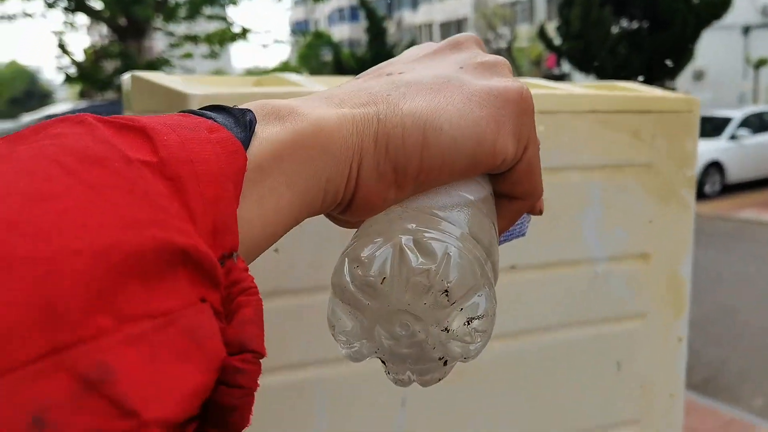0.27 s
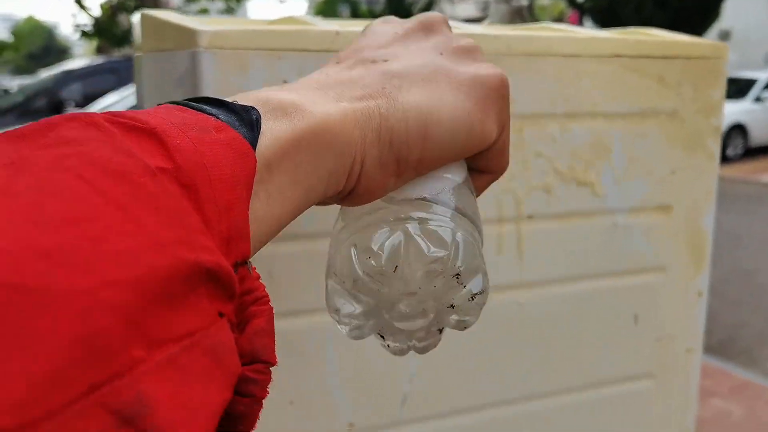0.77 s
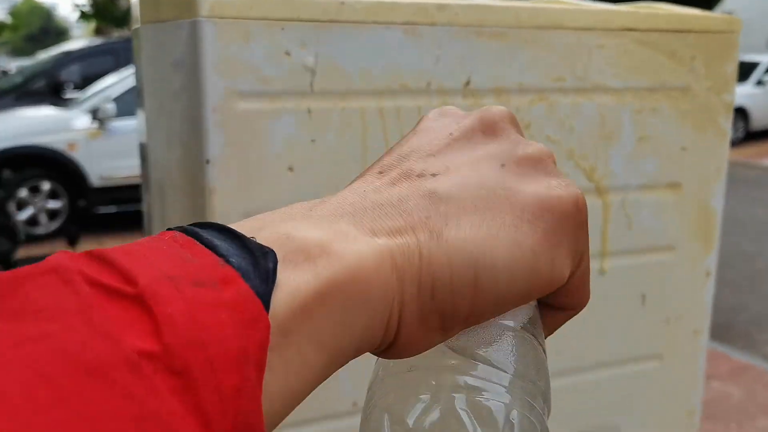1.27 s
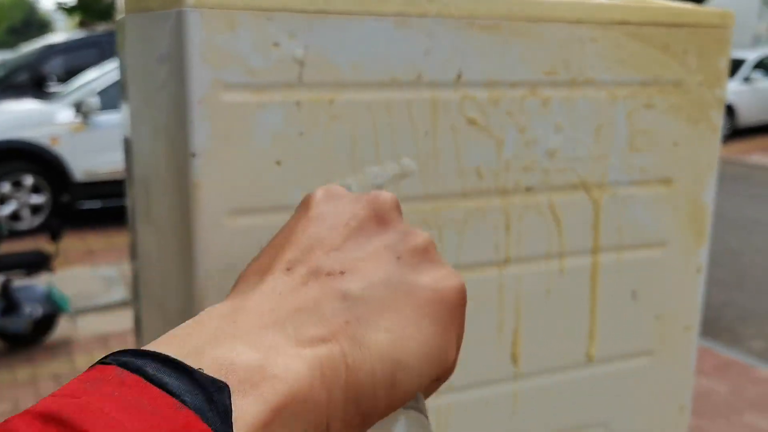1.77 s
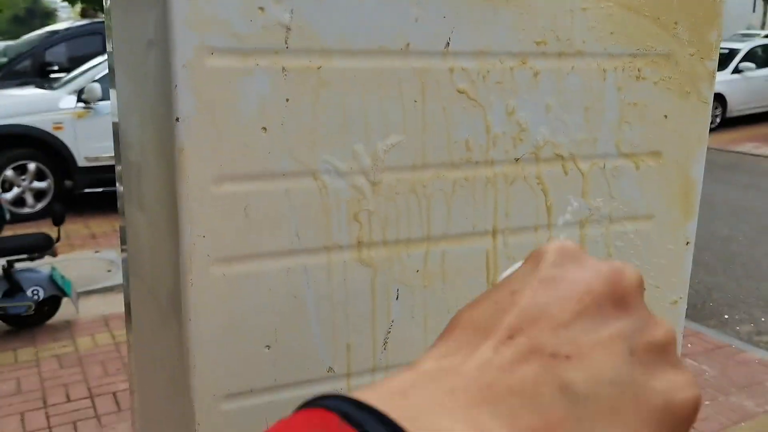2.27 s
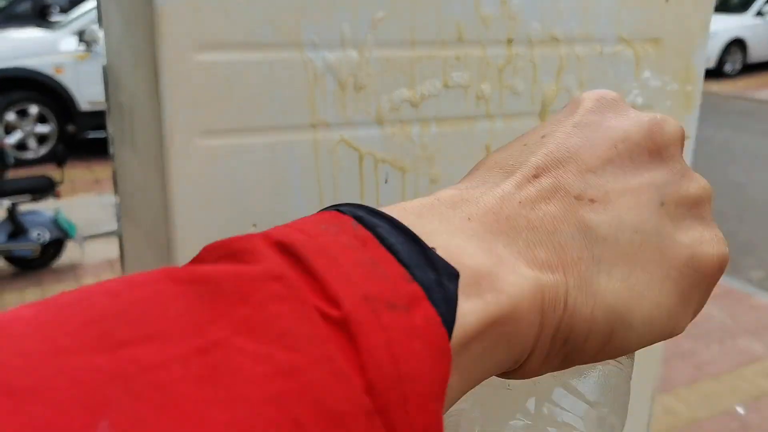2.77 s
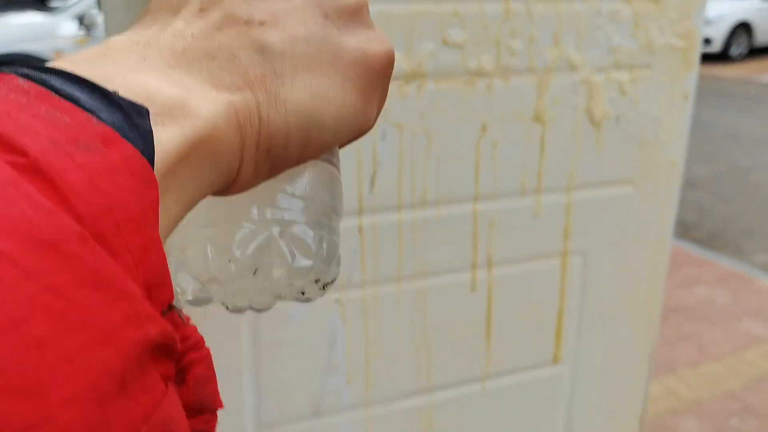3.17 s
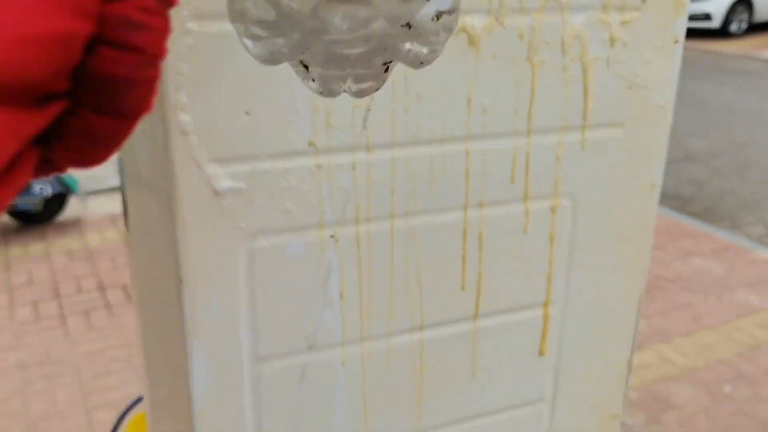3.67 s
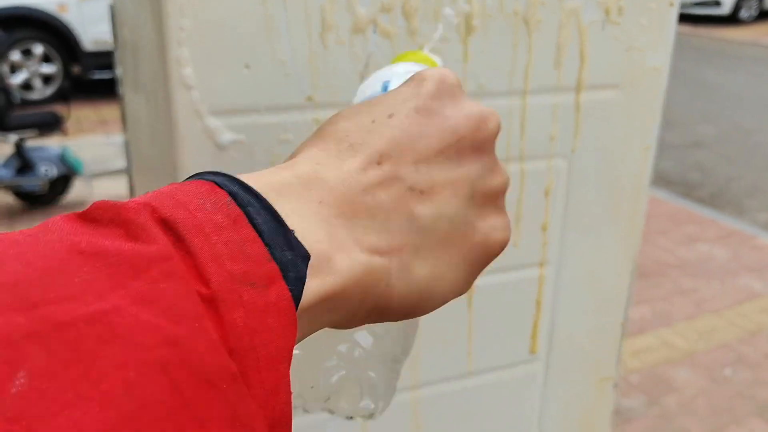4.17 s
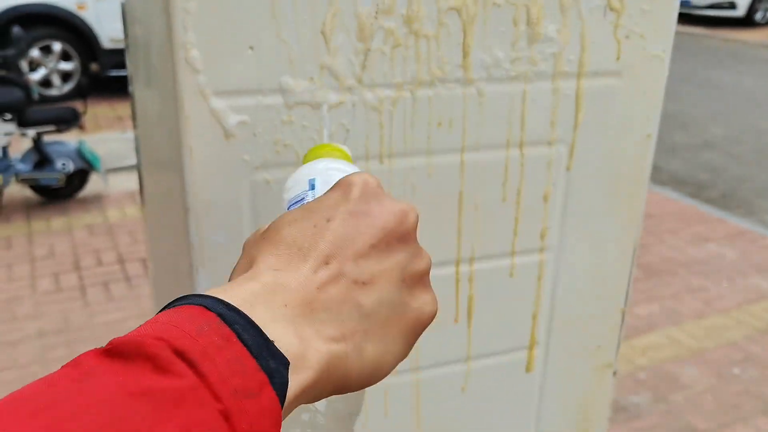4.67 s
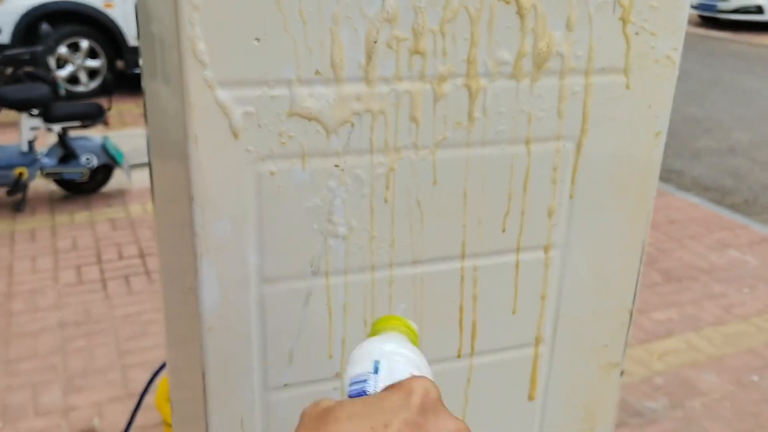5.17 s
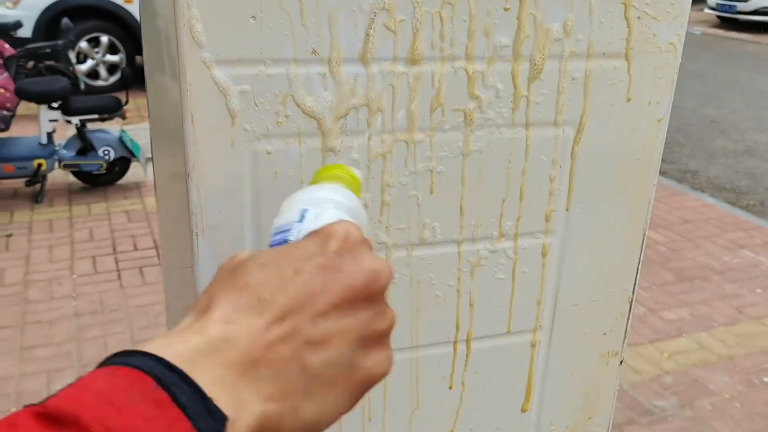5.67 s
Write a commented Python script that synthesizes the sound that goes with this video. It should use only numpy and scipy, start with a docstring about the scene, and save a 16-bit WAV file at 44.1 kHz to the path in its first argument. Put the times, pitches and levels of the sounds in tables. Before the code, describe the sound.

A plastic squeeze bottle sprays a cabinet beside a street, heard very close in stereo with low, soft wind buffeting and a faint distant wash containing a barely audible thin tone. From 0 to 0.8 s come short, uneven hisses and spits, with a snappy plastic pop at 0.18 and a stronger one, mostly right, at 0.37. Near quiet follows, with a dull bottle knock around 1.1. Spray returns at 1.35, swelling until 1.8; a sharp spit at 2.0 leads into a full burst until 2.45, then another from 2.6 to 2.95. From 3.03 the hiss whistles slightly, then weakens into crackly sputters between 3.4 and 3.8, with small plastic pops. A long bright spray runs from 3.9 to 4.7, sweeping in colour as the hand swings. After a few spits, a final strong, swishing spray lasts from 4.9 to the end. Wind thumps the microphone around 3.8 and 5.2.

```python
"""In a street, at a plastic cabinet: a hand squeezes a plastic bottle with a spray cap, close to two microphone ports.
The nozzle is shaped noise that hisses, sputters, spits and whistles; delayed copies echo off the cabinet face.
The bottle wall pops as ringing dents and modes. Wind is low noise in gusts, with thumps at the ports.
Far behind lie a steady street wash of noise and a thin sine tone that wavers, comes and goes."""
import sys
import numpy as np
from scipy import signal
from scipy.fft import rfft, irfft, next_fast_len
from scipy.io import wavfile
from scipy.ndimage import map_coordinates

SR = 44100
rng = np.random.default_rng(int(sys.argv[2]) if len(sys.argv) > 2 else 0)


def int16_out(signal):
    """Quantize to a 16-bit WAV file."""
    q = np.round(np.clip(np.atleast_2d(signal).T, -1, 1) * 32767)
    wavfile.write(sys.argv[1], SR, q.astype(np.int16))


N = 260631

# Spectrum tables list [f/Hz, relative level/dB]; only their shape counts, the noise is scaled to rms 1.

# One curve for each stretch of jet, full spray or weak dribble: [t/s, fine hiss level/dB, coarse hiss level/dB]
JET_CURVES = [
    [(0, -32.5, -40), (.03, -33, -37.5), (.06, -39.5, -41), (.118, -35.5, -39)],
    [(.15, -40, -46), (.18, -43, -30.5), (.205, -57, -48), (.275, -39, -61)],
    [(.298, -30.5, -43.5), (.33, -38, -43.5), (.4, -35, -42), (.455, -37, -44.5)],
    [(.47, -69, -54), (.5, -31, -50), (.525, -44, -56), (.555, -50, -54)],
    [(.645, -37, -52), (.67, -38, -44), (.7, -38, -34.5), (.75, -47.5, -46.5), (.8, -42, -46.5)],
    [(1.34, -53.5, -58), (1.375, -54, -66), (1.41, -36.5, -44)],
    [(1.425, -35, -35.5), (1.47, -32, -30.5), (1.55, -37.5, -34), (1.62, -31.5, -35), (1.69, -36, -35),
     (1.74, -24.5, -31), (1.8, -28, -33), (1.825, -37, -43)],
    [(2.002, -27.5, -44), (2.038, -30, -41.5)],
    [(2.08, -32, -40), (2.14, -25, -35.5), (2.2, -25, -32), (2.29, -27.5, -30), (2.385, -27.5, -25.5),
     (2.425, -26, -26.5), (2.448, -37.5, -38)],
    [(2.615, -32, -38), (2.64, -29, -30), (2.69, -32.5, -31), (2.88, -29.5, -29.5), (2.935, -27, -28)],
    [(2.95, -35, -35.5), (2.99, -57, -48), (3.015, -52, -55)],
    [(3.034, -29.5, -32), (3.06, -29, -34.5), (3.12, -30.5, -36), (3.22, -35.5, -37), (3.29, -26.5, -35.5),
     (3.345, -33, -32)],
    [(3.358, -41.5, -39), (3.47, -41, -36.5), (3.51, -54, -44), (3.56, -50, -37), (3.64, -66, -52),
     (3.76, -54, -51.5), (3.79, -41, -40.5), (3.87, -42, -41)],
    [(3.885, -29.5, -38), (3.97, -28.5, -30.5), (4.08, -30.5, -32.5), (4.17, -23.5, -31),
     (4.3, -24.5, -31.5), (4.4, -29, -32), (4.55, -38, -35.5), (4.63, -28.5, -36), (4.701, -33, -33.5)],
    [(4.72, -58, -54), (4.78, -62, -66)],
    [(4.815, -42, -49), (4.845, -48, -42), (4.852, -54, -47), (4.885, -44, -40)],
    [(4.889, -38, -35.5), (4.91, -33, -30.5), (4.92, -35, -30), (5.03, -23.5, -29.5), (5.1, -33, -35),
     (5.18, -22.5, -29.5), (5.28, -26, -27), (5.4, -28.5, -32), (5.5, -27.5, -30.5), (5.7, -32, -31),
     (5.8, -33.5, -37), (5.91, -26.5, -38)],
]
OPEN_DB_PER_S, SHUT_DB_PER_S = 1596, 1100  # how fast the jet sets in and stops
TRAIL_DB, TRAIL_DB_PER_S = (-12, -14), (330, 190)  # weak trail after the stop: fine, coarse
LEAK_DB = (-82, -75, -89)  # floor between stretches: fine, coarse, splash
# Splash on the cabinet, strong where the jet meets standing liquid: [t/s, level against coarse hiss/dB]
SPLASH_CURVE = [(0, -7), (.3, -11), (.4, -2), (.7, -10), (1.45, -14), (1.65, -10.5), (1.8, -14.5),
                (2.03, -9), (2.2, -11.5), (2.43, -24.5), (2.65, -22), (2.8, -20.5), (3.04, -21), (3.14, -5),
                (3.35, -11), (3.8, -5.5), (3.97, -21), (4.1, -14), (4.4, -19.5), (4.6, -10.5), (4.95, -33),
                (5.18, -42), (5.3, -15.5), (5.7, -20.5), (5.85, -12)]
# Spectra of the jet's fine hiss, coarse hiss and splash: [f/Hz, relative level/dB]
FINE_SPECTRUM = [(4000, -63), (6000, -9.5), (8000, 7), (10000, 8.5), (13000, 3.5), (16000, 7)]
COARSE_SPECTRUM = [(2000, -69), (3000, -13), (4200, 5.5), (5500, 8.5), (7000, 6.5), (8500, 9.5), (10000, 5),
                   (13000, -75)]
SPLASH_SPECTRUM = [(1100, -6.5), (1600, -2), (2200, 6), (3000, 10.5), (4000, 8.5), (6000, -57),
                   (9000, -75.5)]
# The jet runs short of liquid and sputters: [from t/s, to t/s, sputter share 0-1 (held to .95 at most)]
SPUTTER_SPANS = [(0.153, 0.273, 0.96), (0.46, 0.57, 0.56), (0.71, 0.83, 0.9), (1.326, 1.396, 1),
                 (1.806, 1.86, 0.92), (1.993, 2.109, 0.55), (2.932, 3.012, 0), (3.4, 3.787, 0.68),
                 (4.82, 4.892, 0.65)]
STEADY_SPUTTER, SLUGS_PER_S = 0.36, 93  # share outside those spans; middle slug rate
PATCH_DB, PATCH_RATE_HZ = 1.5, 31  # spread and speed of each band's own swelling
# Short ringing grains in the hiss: mean rate, level against coarse hiss, cycles to fall 60 dB
GRAINS_PER_S, GRAINS_DB, GRAIN_CYCLES = 2500, -13.5, 37
# Air breaks through the nozzle: [t/s, peak level before the high-pass/dB, colour f/Hz]
SPIT_EVENTS = [(0.152, -33, 5170), (0.1854, -43, 6370), (0.1954, -41, 8390), (0.2307, -32, 4470),
               (0.239, -32, 8300), (.2515, -45, 6000), (0.275, -33, 8440), (0.4944, -29, 8470),
               (0.54, -25.5, 6300), (0.643, -29, 5950), (0.664, -25, 8000), (0.762, -33, 7800),
               (0.779, -29, 8100), (1.346, -34.5, 7140), (1.3808, -32, 7000), (1.4042, -34, 8000),
               (1.823, -28, 9250), (1.989, -23, 8500), (2.005, -15, 8000), (2.0215, -34, 8000),
               (2.0286, -27, 7400), (2.066, -21, 10600), (2.072, -18, 10900), (2.609, -28, 6400),
               (2.958, -33, 7000), (2.983, -25, 7200), (3.004, -42, 7000), (3.029, -33, 5600),
               (3.3918, -31, 5930), (3.4, -26, 6000), (3.4137, -23, 5770), (3.4514, -20, 3900),
               (3.4686, -22, 5400), (3.48, -29, 5430), (3.489, -24, 3420), (3.5006, -40, 3680),
               (3.527, -30, 5900), (3.539, -32, 3500), (3.544, -39, 3500), (3.567, -25, 6000),
               (3.585, -25.5, 3380), (3.602, -31, 5970), (3.728, -28, 6670), (4.025, -22, 3900),
               (4.7523, -35, 6790), (4.7945, -42, 7000), (4.8048, -27, 7450), (4.817, -28, 7000),
               (4.8426, -26, 7010), (4.8594, -22, 7150), (4.8745, -26, 6390), (4.881, -29, 5500)]
SPIT_RISE_S, SPIT_T60_S, SPIT_COLOUR = .0006, .011, .8  # colour: gain of the ringing part
# The nozzle sings in a narrow band of hiss: [from t/s, to t/s, f/Hz, level at onset/dB]
WHISTLE_SPANS = [(0.668, .73, 8200, -36), (0.771, 0.798, 8220, -35), (3.03, 3.236, 5240, -35),
                 (3.024, 3.22, 7130, -48), (3.239, 3.36, 5640, -40.5), (3.389, 3.435, 5840, -38.5),
                 (4.415, 4.48, 4800, -41), (4.815, 4.832, 3050, -42), (4.607, 4.71, 5900, -37)]

# The hand swings, slowing at each turn; its turning points: [t/s, delay of the cabinet echo/ms]
SWEEP_TURNS = [(0, .45), (.8, .45), (1.4, .62), (1.53, .65), (1.82, .3), (2.0, .52), (2.18, .7),
               (2.48, .33), (2.58, .45), (2.73, .79), (2.99, .4), (3.16, .42), (3.28, .32), (3.68, .89),
               (3.86, .61), (4.04, .84), (4.24, .5), (4.45, .85), (4.65, .55), (4.82, .88), (5.05, .53),
               (5.23, .78), (5.41, .56), (5.59, .79), (5.8, .5), (5.98, .72)]
TREMBLE_MS = .009  # spread of the delay as the splash point dances on the cabinet
LEAD_MS, LEAD_SWING = 0.2745, -0.12  # left port's lead at .65 ms echo delay; ms per ms of echo delay
SCATTER_DB = 0  # hiss scattered off hand and foam, unlike at each port
# Strength of the cabinet echo as the bottle turns: [t/s, left level/dB, right level/dB]
ECHO_CURVE = [(0, -13, -15), (1.3, -13, -15), (1.45, -5, -11), (2.85, -5, -12), (3.0, -5, -4),
              (3.6, -6, -6), (3.8, -7, -12), (4.2, -4.5, -11), (5.2, -4.5, -10), (5.5, -4, -7),
              (5.91, -3.5, -5)]
ECHO_TOP_HZ = 9500  # the wet face scatters the treble
LEFT_ECHO_MS, RIGHT_ECHO_MS = -.02, .04  # each port's offset from the common echo delay

# The bottle wall snaps: [t/s, base level/dB, dent f/Hz, dent t60/s, mode level/dB,
# left-right/dB (moves both ports), rebound share 0-1]
POP_EVENTS = [(0.176, -11.5, 4220, 0.0031, -10, 0.5, 0.76), (0.3687, -5, 2520, 0.015, 0.5, -15, 0.42),
              (0.8279, -34.5, 786, 0.04, 8, -0.5, 0.2), (1.0955, -21.5, 530, 0.062, 9, -12.5, 0),
              (2.1887, -21, 1370, 0.013, -17, 0, 0.2), (2.251, -37, 1500, 0.015, -7, 4, 0.1),
              (3.4408, -19, 3660, 0.013, -33, 1, 0.4), (3.824, -26, 1280, 0.027, 3, -12, 0),
              (3.8422, -29.5, 3240, 0.027, -14, 5, 0), (4.0252, -31, 1705, 0.033, 0, 0, 0.25)]
# Modes of the bottle: [f/Hz, relative level/dB, t60/s]
BOTTLE_MODES = [(344, -8, 0.025), (1097, -7, 0.012), (1460, -13, 0.01), (2325, 4, 0.012),
                (2890, -1.5, 0.01), (3500, -12.5, 0.012), (4150, -2, 0.0091), (5200, -1.5, 0.0073),
                (6000, -0.5, 0.0062), (7000, -4, 0.0063)]
DENT_RISE_CYCLES = .8  # the dent swings up softly
CRACKLE, CRACKLE_S = .2, .0012  # the crease crackles as it flips: gain, time constant

# Gusts: [peak t/s, length/s, buffeting level/dB, rumble level/dB, left-right/dB]
GUST_EVENTS = [(0.17, 0.31, -48, -51.5, 6), (0.46, 0.12, -62, -47.5, 25), (0.842, 0.24, -50.5, -64, 4),
               (1.89, 0.71, -47, -51, 1.5), (2.296, 0.31, -49.5, -52, 1.5), (2.694, 0.19, -48.5, -50, 5.5),
               (3.05, 0.079, -50.5, -65, 15), (3.233, 0.19, -50.5, -70, 11),
               (3.747, 0.22, -48.5, -46.5, 14.5), (3.85, 0.12, -45.5, -43.5, 9),
               (4.317, 0.16, -48.5, -56, 1), (4.498, 0.055, -45, -59, 13), (5.166, 0.18, -45, -70, 15.5),
               (5.25, 0.23, -50.5, -69, 2), (5.636, 0.36, -48, -63, 6)]
BREEZE_DB, BREEZE_PAN_DB = (-56.5, -57.5), -1  # buffeting and rumble between gusts; left-right
GUST_RISE = 0.33  # share of a gust's length before its peak
# Spectra of the buffeting, its upper part in strong gusts and the rumble: [f/Hz, relative level/dB]
BUFFET_SPECTRUM = [(60, -25), (100, -3), (135, 0.5), (200, -10.5), (320, -18.5), (600, -43)]
GUST_TOP_SPECTRUM = [(120, -60), (200, 7.5), (300, 4.5), (450, -7), (800, -19), (1500, -15)]
RUMBLE_SPECTRUM = [(20, -19), (40, 8), (60, 11), (85, 10.5), (120, -1.5), (200, -42)]
# Eddies slap the ports: [t/s, level before the band-pass/dB, left-right/dB, f/Hz]
THUMP_EVENTS = [(1.722, -27, -2, 110), (1.856, -37, 4, 260), (1.969, -30.5, 7, 340),
                (1.993, -31.5, 15, 246), (2.288, -28, 8, 148), (2.675, -28, -5, 119),
                (3.674, -37.5, 16, 318), (3.696, -37, 19, 220), (3.796, -33.5, 17, 240),
                (3.862, -26, 12, 149), (4.52, -32, 14, 205), (5.132, -34, 19, 205),
                (5.1601, -27, 19.5, 212), (5.1881, -33, 18, 205), (5.22, -31, 5, 205),
                (5.628, -32, 21, 205)]
THUMP_CYCLES = 3.1  # cycles to fall 60 dB

# Spectrum of the far street wash: [f/Hz, relative level/dB]
STREET_SPECTRUM = [(150, -2), (350, -6), (600, -5.5), (1000, -6.5), (1600, -7.5), (2350, -2), (3000, -9),
                   (4500, -13), (6000, -16), (7500, -24), (9000, -78), (15000, -56)]
STREET_DB = -59.5  # level of each port's own part of the wash
# Thin tone that comes and goes: [t/s, level ahead of the port gains/dB]
TONE_CURVE = [(0, -70), (.55, -62), (1.4, -66), (3.3, -66), (3.65, -61), (4.15, -61), (4.4, -66),
              (4.75, -60), (5.4, -60), (5.9, -70)]
TONE_HZ, TONE_WAVER_DB = 1299, 3

# Port resonances, one list for the left and one for the right: [f/Hz, width/Hz, level/dB]
PORT_RESONANCES = [
    [(7300, 5400, 5), (9300, 4470, -9.5), (12600, 12000, -1), (14900, 2500, 5.5)],
    [(1597, 68, 7.5), (8440, 2860, -11), (11250, 1700, 6), (14200, 220, 1.5)],
]
CUTOFF_HZ = 15500


def nozzle():
    """Jet noise along its curves, chopped by slugs of liquid and air; three unrelated draws."""
    fine, coarse, splash = jet_gains()
    sputter = np.full(N, STEADY_SPUTTER)
    for start, stop, share in SPUTTER_SPANS:
        sputter[round(start * SR):round(stop * SR)] = min(share, .95)
    # Slugs follow each other unevenly, each with its own strength
    turns = np.cumsum(SLUGS_PER_S / SR * from_db(3.0 * drift(40)))
    starts = np.diff(np.floor(turns), prepend=0) * from_db(rng.normal(0, 2.8, N))
    # A slug bursts out fast and trails off
    fall = np.exp(-1 / (.0035 * SR))
    rise = np.exp(-1 / (.0005 * SR))
    slugs = rms_one(signal.lfilter([1], np.convolve([1, -fall], [1, -rise]), starts))
    chop = np.sqrt(1 - sputter ** 2 + (sputter * slugs) ** 2)
    hiss = np.zeros((3, N))
    for spectrum, gain in ((FINE_SPECTRUM, fine), (COARSE_SPECTRUM, coarse), (SPLASH_SPECTRUM, splash)):
        flutter = from_db(0.85 * drift(220) + 2.12 * drift(8.7))
        hiss += gain * flutter * coloured(spectrum, channels=3)
    ringing = from_db(GRAINS_DB) * coarse * grains()
    return chop * (patchy(hiss) + ringing)


def jet_gains():
    """Gains of fine hiss, coarse hiss and splash: each stretch of jet has steep ends and a weak trail."""
    t, hiss = np.arange(N) / SR, np.zeros((2, N))
    for rows in JET_CURVES:
        s, *levels = np.transpose(rows)
        near = slice(max(round((s[0] - .1) * SR), 0), round((s[-1] + .5) * SR))
        before = np.maximum(s[0] - t[near], 0)
        after = np.maximum(t[near] - s[-1], 0)
        for k, level_db in enumerate(levels):
            trail = (after > 0) * from_db(TRAIL_DB[k] - TRAIL_DB_PER_S[k] * after)
            tail = from_db(-SHUT_DB_PER_S * after) + trail
            gain = from_db(np.interp(t[near], s, level_db) - OPEN_DB_PER_S * before) * tail
            hiss[k, near] = np.maximum(hiss[k, near], gain)
    fine, coarse = hiss
    splash = coarse * from_db(in_time(SPLASH_CURVE)[0])
    return [np.hypot(gain, from_db(db)) for gain, db in zip((fine, coarse, splash), LEAK_DB)]


def patchy(x):
    """Narrow bands of the jet swell and thin independently."""
    edges, out = np.geomspace(2200, 15000, num=16), x.copy()
    for low, high in zip(edges, edges[1:]):
        band = signal.sosfilt(signal.butter(1, [low, high], "band", fs=SR, output="sos"), x)
        out += (from_db(PATCH_DB * drift(PATCH_RATE_HZ)) - 1) * band
    return out


def grains():
    """Short random ringing grains for the hiss, pitches spread over 3.2-8.5 kHz; rms 1."""
    sizes = from_db(3.7 * np.minimum(rng.exponential(1, (3, N)), 5))
    clicks = sizes * (rng.random((3, N)) < GRAINS_PER_S / SR)
    dealt = rng.integers(0, 14, (3, N))  # which pitch each grain gets
    out = np.zeros((3, N))
    for k, hz in enumerate(np.geomspace(3200, 8500, num=14)):
        out += ring(clicks * (dealt == k) + 1e-18, hz, GRAIN_CYCLES / hz)
    return rms_one(out)


def spits():
    """Air breaking through makes short puffs of jet noise, each with a broad colour of its own."""
    out, t = np.zeros((3, N)), np.arange(2000) / SR
    white = rng.standard_normal((len(SPIT_EVENTS), 3, len(t)))
    burst = (1 - np.exp(-t / SPIT_RISE_S)) ** 2 * from_db(-60 * t / SPIT_T60_S)
    for (s, peak_db, hz), puff in zip(SPIT_EVENTS, white * burst):
        puff = np.diff(puff, prepend=0) + SPIT_COLOUR * ring(puff, hz, .002)
        at = round(s * SR)
        out[:, at:at + len(t)] += from_db(peak_db) * puff / np.abs(puff).max(axis=1, keepdims=True)
    return signal.sosfilt(signal.butter(2, 2800, "high", fs=SR, output="sos"), out)


def whistles():
    """The nozzle sings: noise twice through a narrow resonance, sinking 5 dB over its length."""
    out = np.zeros((3, N))
    for start, stop, hz, level_db in WHISTLE_SPANS:
        at, end = round(start * SR), round(stop * SR)
        once = ring(rng.standard_normal((3, 12000)), hz, .003)
        tone = rms_one(ring(once, hz, .003))[:, :end - at]
        out[:, at:end] += from_db(level_db + np.linspace(0, -5.0, end - at)) * tone
    return out


def off_cabinet(jet):
    """Each port hears the nozzle, a scattered share of its own and the dull echo of both off the cabinet."""
    s, ms = np.transpose(SWEEP_TURNS)
    turn = np.interp(np.arange(N) / SR, s, np.arange(len(s)))
    eased = np.floor(turn) + (1 - np.cos(np.pi * (turn % 1))) / 2
    echo_ms = np.interp(eased, np.arange(len(s)), ms) + TREMBLE_MS * drift(29)
    echo = from_db(np.minimum(in_time(ECHO_CURVE), -2))
    direct = [jet[0], late(jet[0], LEAD_MS + LEAD_SWING * (echo_ms - .65))]
    near = direct + from_db(SCATTER_DB) * jet[1:]
    dull = signal.sosfilt(signal.butter(2, ECHO_TOP_HZ, fs=SR, output="sos"), near)
    back = echo * [late(dull[0], echo_ms + LEFT_ECHO_MS), late(dull[1], echo_ms + RIGHT_ECHO_MS)]
    # All paths together keep roughly the jet's power
    return (near + back) / np.sqrt((1 + from_db(2 * SCATTER_DB)) * (1 + echo ** 2))


def pops():
    """A dent flips with its own pitch and two quick rebounds, shaking most the bottle modes near it."""
    out, t = np.zeros((2, N)), np.arange(3000) / SR
    for s, base_db, hz, t60, modes_db, pan_db, rebound in POP_EVENTS:
        snap = np.zeros(len(t))
        snap[[0, 49, 95]] = 1, rebound, -.4 * rebound
        snap += CRACKLE * np.diff(rng.standard_normal(len(snap) + 1)) * np.exp(-t / CRACKLE_S)
        modes = np.zeros(len(t))
        for mode_hz, db, mode_t60 in BOTTLE_MODES:
            octaves = abs(np.log2(mode_hz / hz))
            modes += from_db(db - 4.6 * octaves) * ring(snap, mode_hz, mode_t60)
        dent = ring(snap, hz, t60) * (1 - np.exp(-t * hz / DENT_RISE_CYCLES))
        sound = dent + from_db(modes_db) * modes
        band = [.38 * hz, min(7 * hz, 7800)]  # a small soft dent
        sound = signal.sosfilt(signal.butter(2, band, "band", fs=SR, output="sos"), sound)
        for k, lag in enumerate((0, 8)):  # samples; the right port hears it later
            at = round(s * SR) + lag
            out[k, at:at + len(snap)] += from_db(base_db + pan_db * (1.5 - k)) * sound
    return out


def wind():
    """Lumpy low noise, mostly its own at each port; strong gusts reach higher."""
    buffet_db, rumble_db, pan_db = gusting()
    lumps = from_db([4.2 * drift(15), 4.2 * drift(15)])
    left, right, shared = coloured(BUFFET_SPECTRUM, channels=3)
    low = np.array([left + 0.31 * shared, right + 0.41 * shared])
    top = from_db(1.9 * (buffet_db + 47.5) - 7) * coloured(GUST_TOP_SPECTRUM, channels=2)
    buffet = from_db(buffet_db) * lumps * (low + top)
    rumble = from_db(rumble_db) * coloured(RUMBLE_SPECTRUM, channels=2)
    return from_db(pan_db * np.array([[.5], [-.5]])) * (buffet + rumble)


def gusting():
    """Gusts swell and sink smoothly over the breeze; the strongest weighs most in the left-right balance."""
    t = np.arange(N) / SR
    power = np.outer(from_db(2 * np.array(BREEZE_DB)), np.ones(N))
    pan = from_db(2 * BREEZE_DB[0]) * BREEZE_PAN_DB
    for s, length, buffet_db, rumble_db, pan_db in GUST_EVENTS:
        side = length * np.where(t < s, GUST_RISE, 1 - GUST_RISE)
        swell = np.exp(-2 * ((t - s) / side) ** 2) * from_db([[2 * buffet_db], [2 * rumble_db]])
        power = power + swell
        pan = pan + pan_db * swell[0]
    buffet_db, rumble_db = 10 * np.log10(power)
    return buffet_db, rumble_db, pan / power[0]


def thumps():
    """An eddy slaps the ports: one soft push that swings back a few times."""
    out = np.zeros((2, N + 4000))
    for s, level_db, pan_db, hz in THUMP_EVENTS:
        swing = ring(np.r_[1., np.zeros(3999)], hz, THUMP_CYCLES / hz)
        at = round(s * SR)
        out[:, at:at + len(swing)] += from_db(level_db + pan_db * np.array([[.5], [-.5]])) * swing
    return signal.sosfilt(signal.butter(2, [70, 600], "band", fs=SR, output="sos"), out[:, :N] + 1e-18)


def street():
    """A steady far wash of noise, partly shared by the ports, and a thin wavering sine."""
    shared, left, right = coloured(STREET_SPECTRUM, channels=3)
    wash = from_db(STREET_DB) * np.array([left + 1.34 * shared, right + 1.3 * late(shared, 0.25)])
    tone_gain = from_db(in_time(TONE_CURVE)[0] + TONE_WAVER_DB * drift(13.0))
    tone = tone_gain * np.sin(2 * np.pi * TONE_HZ * np.arange(N) / SR)
    return wash + tone * [[.6], [-1.4]]  # opposite in phase at the two ports


def from_db(db):
    """Gain of a level in dB."""
    return 10 ** (np.asarray(db) / 20)


def rms_one(x):
    """Scale to unit rms over all channels together."""
    return x / np.sqrt(np.mean(x ** 2) + 1e-20)


def in_time(rows):
    """Columns of a table as one value a sample."""
    s, *columns = np.transpose(rows)
    return [np.interp(np.arange(N) / SR, s, c) for c in columns]


def coloured(spectrum, channels):
    """Steady noise with the given spectrum, rms 1."""
    size = next_fast_len(N)
    hz, level_db = np.transpose(spectrum)
    # The spectrum keeps falling above its last point
    hz, level_db = np.r_[hz, 4 * hz[-1]], np.r_[level_db, level_db[-1] - 40]
    bins_hz = np.arange(1, size // 2 + 2) * SR / size
    shape = from_db(np.interp(np.log(bins_hz), np.log(hz), level_db, left=-90))
    white = rng.standard_normal((channels, size))
    return rms_one(irfft(rfft(white) * shape, size)[:, :N])


def drift(rate_hz):
    """Slow chance: noise through two equal low-pass poles, rms 1."""
    r = np.exp(-2 * np.pi * rate_hz / SR)
    return rms_one(signal.lfilter([1], [1, -2 * r, r * r], rng.standard_normal(N + SR))[SR:])


def ring(x, hz, t60):
    """A unit click sets a decaying sine of starting height 1 ringing."""
    r, w = from_db(-60 / (t60 * SR)), 2 * np.pi * hz / SR
    return signal.lfilter([0, np.sin(w)], [1, -2 * r * np.cos(w), r * r], x)


def late(x, ms):
    """Read a sound later by a fixed or moving delay."""
    return map_coordinates(x, [np.arange(N) - ms * SR / 1000], order=3, prefilter=True)


def scene():
    """Spray and pops close by, wind at the ports and the street around."""
    jet = nozzle() + spits() + whistles()
    return off_cabinet(jet) + pops() + wind() + thumps() + street()


def record(dry):
    """Each microphone port colours the sound with its resonances and dips; the top is cut."""
    out = dry.copy()
    for k, port in enumerate(PORT_RESONANCES):
        for hz, width_hz, db in port:
            w, lift = 2 * np.pi * hz / SR, from_db(db / 2)
            a = np.sin(w) * width_hz / hz / 2
            zeros = [1 + a * lift, -2 * np.cos(w), 1 - a * lift]
            poles = [1 + a / lift, -2 * np.cos(w), 1 - a / lift]
            out[k] = signal.lfilter(zeros, poles, out[k])
    return signal.sosfilt(signal.ellip(12, .5, 75, CUTOFF_HZ, fs=SR, output="sos"), out)


dry = scene()
out = record(dry)
int16_out(out)
```